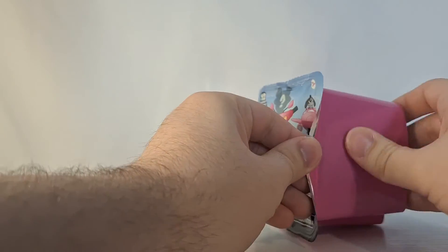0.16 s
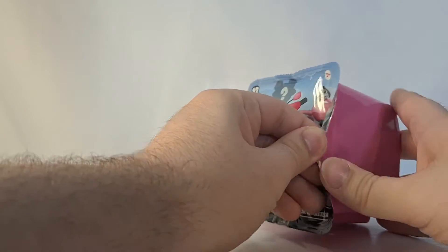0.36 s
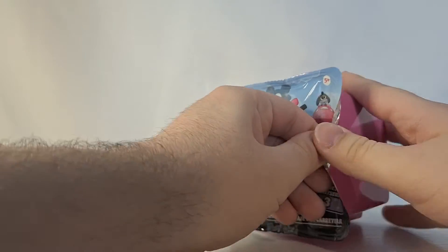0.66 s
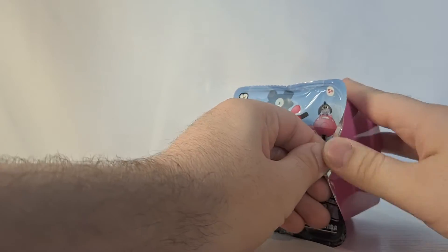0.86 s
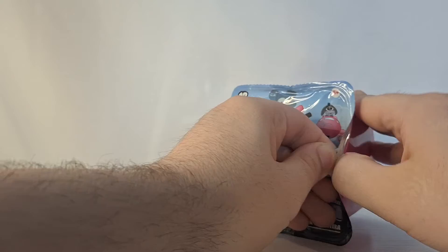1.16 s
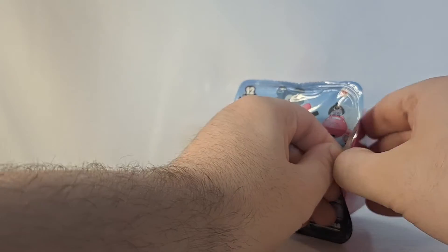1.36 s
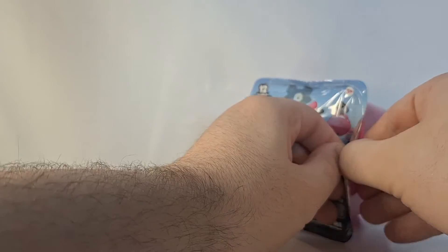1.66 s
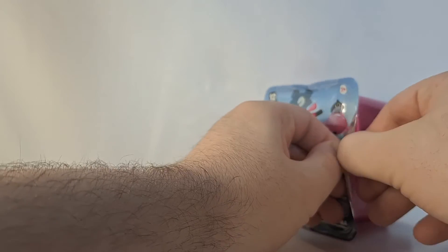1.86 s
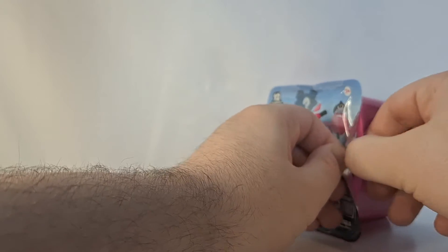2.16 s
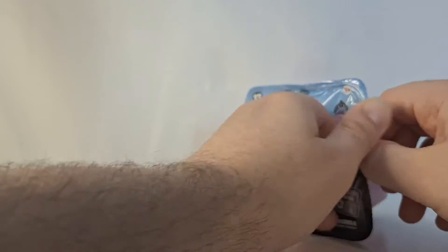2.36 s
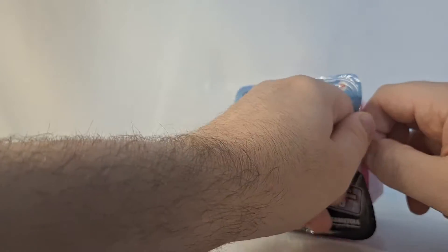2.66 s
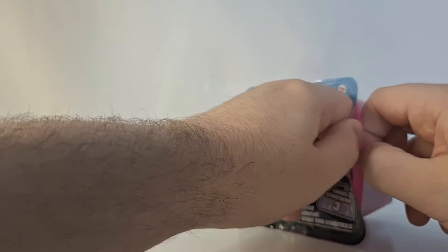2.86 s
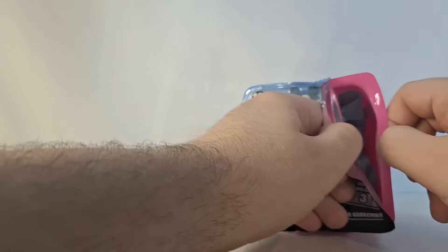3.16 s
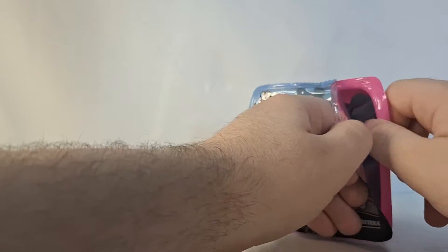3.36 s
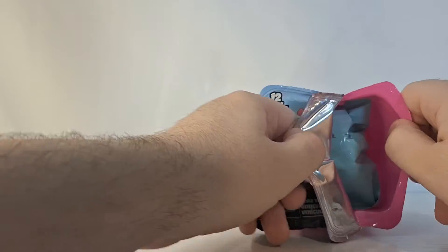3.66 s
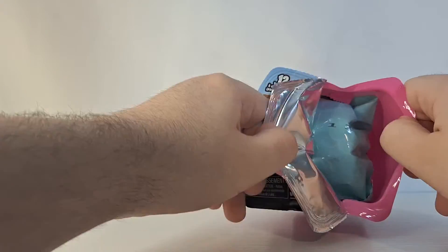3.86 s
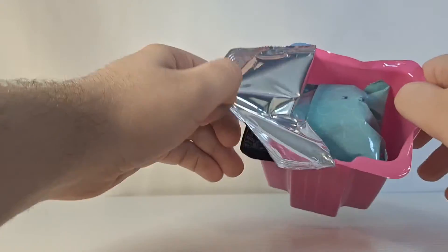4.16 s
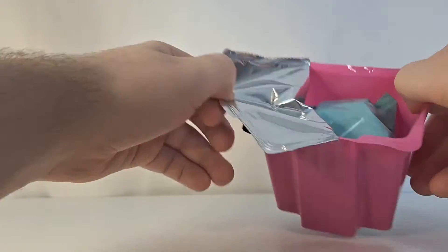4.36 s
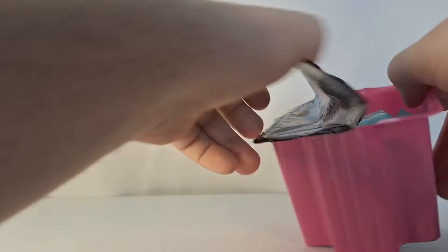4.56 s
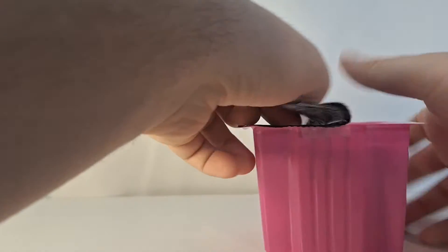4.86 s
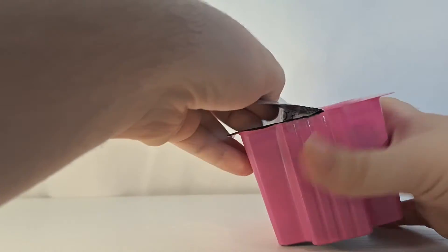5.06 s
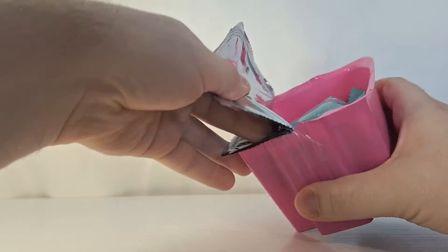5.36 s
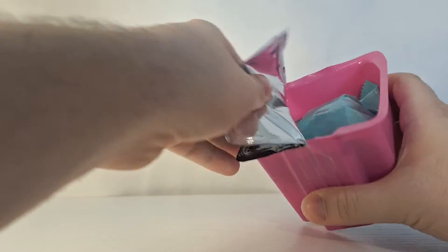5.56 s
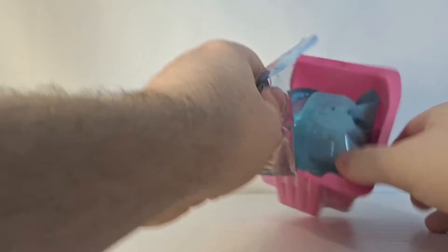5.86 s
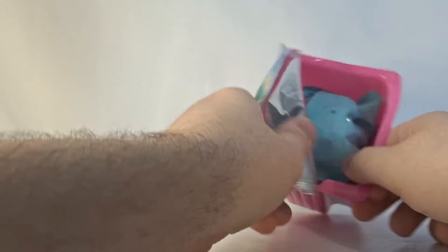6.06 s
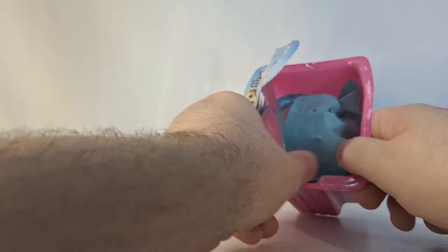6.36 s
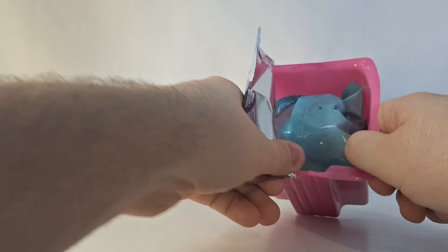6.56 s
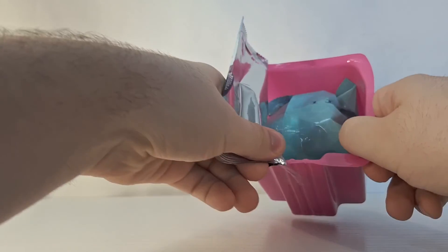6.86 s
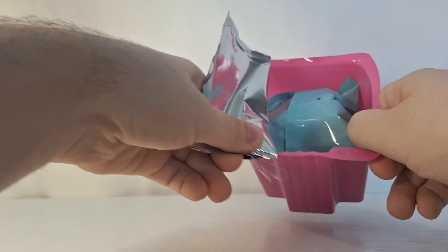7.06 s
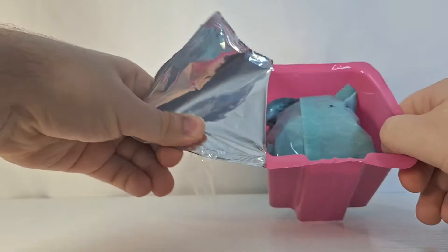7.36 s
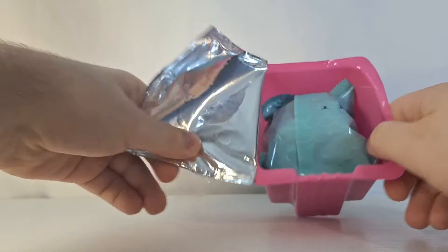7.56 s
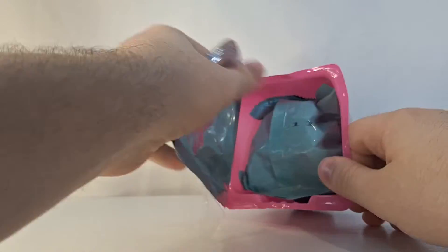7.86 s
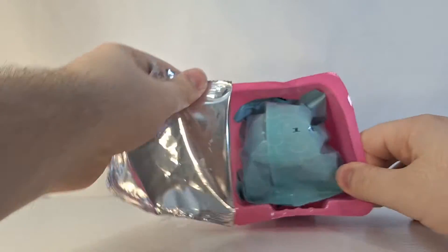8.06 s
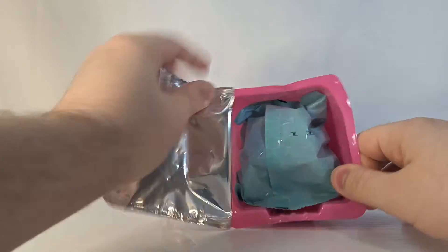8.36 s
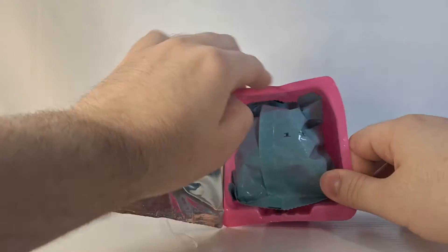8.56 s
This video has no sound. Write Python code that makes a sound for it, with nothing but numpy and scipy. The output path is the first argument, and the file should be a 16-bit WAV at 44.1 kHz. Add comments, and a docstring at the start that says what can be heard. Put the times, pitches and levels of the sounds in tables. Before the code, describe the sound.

Foil seal peeled off a hollow plastic tray: sharp irregular crackles, hollow pops and papery crinkling, with soft handling thumps in a quiet room.

```python
"""Sharp, uneven crackles: fingers peel a foil seal off a hollow plastic tray on a table, in a small quiet room.
Each fold that snaps or glue spot that lets go gives a noisy crack and makes the tray's hollow ring for a few cycles.
Between the loud snaps the sheet crinkles at random, from many tiny rings and bursts of noise,
and fingers and tray rumble on the table: low noise in soft pushes, plus a few knocks.
Flat surfaces and the room answer, over a faint hush; a two-microphone phone close by picks it all up."""
import sys
import numpy as np
from scipy import signal
from scipy.fft import rfft, irfft
from scipy.io import wavfile

SR = 44100
rng = np.random.default_rng(int(sys.argv[2]) if len(sys.argv) > 2 else 0)


def store_pcm(level_fs):
    """Save levels as 16-bit WAV."""
    pcm = np.round(np.clip(level_fs, -1, 1) * 32767).astype(np.int16)
    wavfile.write(sys.argv[1], SR, np.atleast_2d(pcm).T)


N = 383953  # length in samples

# The loud snaps. Each row: start in seconds, ring level in dB, then levels relative to that ring:
# foil facet in dB, crack in dB.
SNAPS = [(0.108, -37.5, -20, -34), (0.127, -33.5, -17.5, -33), (0.184, -41, -8, -16), (0.23, -32, -8, -11),
         (0.272, -31, -11.5, -29), (0.338, -22, -25, -53), (0.554, -33.5, -25, -37), (0.651, -17, -14, -9),
         (0.699, -17, -6, 5), (0.771, -12.5, -3.5, -12), (1.032, -21, -3, -5), (1.109, -27.5, -2, 5.5),
         (1.133, -17, -2, 0), (1.224, -40.5, -8, 9), (1.412, -29, -11, -14), (1.427, -14, -0.5, 0.5),
         (1.46, -20.5, -21, 4.5), (1.485, -16.5, -14, 4.5), (1.509, -12.5, -2, 1), (1.686, -6, -16.5, -9.5),
         (1.762, -24, -11, -26), (1.787, -37.5, -1, 2), (1.891, -28, -10, -10), (1.907, -14.5, -11, -2),
         (1.911, -17.5, -5, -1.5), (1.933, -17, -12, -16), (1.953, -12.5, -11, -5), (1.961, -16, -7.5, -5),
         (2.243, -28, -7.5, -3.5), (2.345, -19.5, -4, -11), (2.365, -23.5, -7, -12),
         (2.375, -24.5, 2.5, 3.5), (2.396, -21.5, -21, -14), (2.405, -21.5, -1.5, -11),
         (2.46, -19, -9, -26), (2.463, -26, 0, -21), (2.527, -13, -11, -13.5), (2.541, -23.5, -18, -28),
         (2.586, -25.5, 2, -15), (2.628, -28.5, 3.5, 7), (2.647, -39, -22, 9), (2.716, -45, 2, 9),
         (2.779, -34, -6, -16), (2.79, -28.5, -17, -14), (2.823, -33.5, -15, 2.5), (2.831, -23, -16, -8),
         (2.854, -18, -28, -20), (2.9, -11, -3.5, -1), (2.943, -30, -24, 3.5), (3.017, -9, -17, -5.5),
         (3.024, -13, -16, -11), (3.037, -6.5, -17, -6.5), (3.051, -11, -20, -18), (3.063, -10, -25, -5.5),
         (3.082, -11, -15, -14), (3.104, -8.5, -17, -15), (3.112, -9, -15, -11), (3.116, -13, -4.5, -7),
         (3.133, -14.5, -11, -3), (3.142, -15.5, -3, -6.5), (3.192, -21.5, -14, -18),
         (3.217, -13, -16, -10.5), (3.234, -20, 2, -8.5), (3.271, -11.5, -30, -4), (3.283, -25, -29, 2),
         (3.461, -23.5, -5, -1), (3.474, -30, -8, 6.5), (3.491, -15.5, -8, -5), (3.511, -14, -13, -7),
         (3.549, -21, -22, -24), (3.566, -18, 2.5, 7.5), (3.578, -22.5, -8, 4), (3.639, -27.5, 4.5, -9),
         (3.697, -29.5, 5, 4), (3.782, -23, 7, 3), (3.842, -19, -1.5, -1.5), (3.954, -31, -10, -40),
         (4.016, -14.5, -2.5, -4), (4.036, -16, -31, -13), (4.062, -12.5, -30, -2.5),
         (4.089, -11.5, -31, -14), (4.098, -16, -22, -0.5), (4.148, -17.5, -18, -8),
         (4.161, -16, -4.5, -3.5), (4.238, -31, -26, -37), (4.329, -15.5, -34, -3.5), (4.392, -26, -6, -5),
         (4.416, -20, -4.5, -19), (4.43, -16, -10, -23), (4.445, -20, -21, -11), (4.477, -25, -18, -18),
         (4.504, -18, -9, -7.5), (4.516, -10, -11.5, -25), (4.59, -34, -10, -6), (4.647, -29, -4, -0.5),
         (4.779, -29.5, -12, -4.5), (4.796, -31, -8, -9), (4.822, -17.5, -6.5, -11),
         (4.859, -22.5, -6, 0.5), (4.932, -26.5, -13, -5), (4.97, -38, 1, -8), (4.999, -19.5, 0, 0),
         (5.037, -19.5, -16, -23), (5.052, -27.5, 9.5, 6), (5.157, -24.5, -22, -17), (5.178, -35.5, 6, -3),
         (5.199, -28.5, 3, 13.5), (5.237, -27, -5.5, -5), (5.293, -25, -12, -3), (5.328, -22.5, -3.5, 4),
         (5.366, -14, -16, -28), (5.413, -27, -6, -4.5), (5.45, -15.5, -8.5, -14.5), (5.478, -25, 0, -10),
         (5.487, -25, -6, -21), (5.529, -19, -6, -11.5), (5.538, -22.5, -8, -6.5), (5.589, -28.5, -17, -10),
         (5.619, -19.5, 0.5, -4.5), (5.655, -18, -2, -8), (5.669, -22, -7, -18), (5.706, -20, -6, -2),
         (5.773, -18, -12, -5.5), (5.825, -25, -12, -17), (5.848, -15.5, -4.5, -13),
         (5.881, -22.5, -2, 3.5), (5.893, -18.5, -2, 0.5), (5.917, -17, -11, -11.5), (5.942, -22, -13, -23),
         (5.969, -24.5, 6, -2.5), (6.063, -28, -4.5, -6.5), (6.101, -46, -1, 4), (6.133, -27, 7, -3),
         (6.4, -36.5, 8.5, 5.5), (6.465, -37, -14, 3.5), (6.517, -16, -5, 1), (6.537, -22, -0.5, -4),
         (6.546, -26.5, -1, 3.5), (6.591, -28.5, 2.5, 0), (6.621, -35, -4, 5), (6.654, -43.5, -10, 8.5),
         (6.674, -23.5, 0.5, -1.5), (6.69, -22.5, -20, -6), (6.798, -47.5, -28, 4), (6.853, -31.5, -13, 0),
         (6.902, -27, -24, 1.5), (6.921, -21, -26, -3), (7.03, -56.5, 12, 16.5), (7.064, -19.5, -1.5, 0.5),
         (7.076, -21, -7, 3.5), (7.124, -16, -15, -4), (7.136, -21, -18, -5), (7.178, -8, -17, -24),
         (7.19, -12.5, -12, -10), (7.197, -8, -18, -16), (7.213, -11.5, -11, -10.5), (7.221, -11, -18, -13),
         (7.263, -16.5, -13, -22), (7.462, -40.5, -24, -29.5), (7.5, -60.5, 9, 0), (7.54, -15.5, -18, -20),
         (7.612, -34, -16, -11), (7.671, -29.5, -23, -10), (7.765, -36, -2.5, 4), (7.812, -33.5, -3, -4),
         (7.877, -42.5, 1, -3.5), (7.923, -24, -15, -16), (7.949, -35, -16, -15), (8.027, -42, -15, 11),
         (8.08, -37, -17, 1.5), (8.097, -37, -24, -12), (8.116, -30.5, -26, 1.5), (8.211, -30, -2, 6),
         (8.3, -48, 3, 3.5), (8.356, -29.5, -8.5, -13), (8.391, -27.5, -12, -14), (8.409, -21.5, 4.5, -0.5),
         (8.467, -34.5, 5, -12), (8.515, -30, -4.5, -17), (8.575, -17, -2, -8), (8.632, -24, -4, -5),
         (8.675, -22.5, 1, 2.5)]
# Slow drift of two layers. Each row: time in seconds, change of the rumble in dB,
# change of the snaps' sizzle in dB.
DRIFT = [(0, 2.5, -4), (.3, 6, -2), (.8, -5, -5.5), (1.3, -7.5, -10), (1.8, -5.5, -4.5), (2.2, -10, -0.5),
         (2.7, 4.5, 4.5), (3.2, -3.5, 1.5), (3.8, 5, -2), (4.4, 0, 9), (5, 4, 1), (5.6, -1.5, -2.5),
         (6.2, 0, -8), (6.7, -5, 8.5), (7.2, 4.5, 0.5), (7.5, 0.5, -4), (7.9, 3, -1.5), (8.3, -1, 5.5),
         (8.7, 0, 0)]


def undb(db):
    """Turn decibels into a plain gain factor."""
    return 10 ** (np.asarray(db) / 20)


def colour(x, points):
    """Filter by a curve of (Hz, dB) points; the folded cepstrum makes it act without any pre-echo."""
    hz, db = np.transpose(points)
    grid_hz = np.linspace(1, SR / 2, 2049)
    gain = undb(np.interp(np.log(grid_hz), np.log(hz), db))
    cepstrum = irfft(np.log(gain))
    # fold the backward half onto the forward half
    cepstrum[1:2048] *= 2
    cepstrum[2049:] = 0
    response = irfft(np.exp(rfft(cepstrum)))
    return signal.oaconvolve(x, response)[:N]


def band(x, lo_hz, hi_hz):
    """Keep mainly the pitches between two edges."""
    edges = [lo_hz, min(hi_hz, .45 * SR)]
    return signal.sosfilt(signal.butter(2, edges, "band", fs=SR, output="sos"), x)


def lay(s, grains):
    """Add up short sounds, one per row, each starting at its time in seconds."""
    start = np.clip((s * SR).astype(int), 0, N)
    at = start[:, None] + np.arange(grains.shape[1])
    return np.bincount(at.ravel(), grains.ravel(), N + grains.shape[1] + 1)[:N]


def rings(s, db, hz, cycles, size):
    """A push that swells for the given cycles of its pitch and dies soon after; size is in samples."""
    turns = np.arange(size) / SR * hz[:, None]
    swell = (turns / cycles * np.exp(1 - turns / cycles)) ** 1.43
    return lay(s, undb(db)[:, None] * swell * np.sin(2 * np.pi * turns))


def scatter(per_s, spread_db):
    """Random moments, sizes in dB of which a few lie far from the rest, and four more draws for each."""
    chance = rng.random((int(per_s * N / SR), 6)).T
    s = chance[0] * N / SR
    size_db = -spread_db * np.log(np.maximum(chance[1], .025))
    return s, size_db, chance[2:]


def hush():
    """Faint room tone: steady coloured noise, partly different at the two microphones."""
    # Each row: frequency in Hz, relative level in dB.
    tone = [(18, -24), (30, 15), (437, -15), (554, 5.5), (632, 0.5), (988, -4.5), (1390, -50.5),
            (6900, -21.5), (16000, -36)]
    level_db = -66  # of the part common to both microphones
    mid, side = (colour(rng.standard_normal(N), tone) for _ in range(2))
    return undb(level_db) / mid.std() * (mid + 0.54 * side * np.array([[1], [-1]]))


def room(x):
    """Table and walls answer with a dense tail of noise that dies soonest in the bass, last in the middle."""
    # Bands of the tail. Each row: low edge in Hz, high edge in Hz, seconds to fade by 60 dB, level in dB.
    tail_bands = [(42.1, 170, 0.089, -3), (583, 1550, 0.15, -5), (1380, 5870, 0.14, -2.5),
                  (6270, 15000, 0.14, -1)]
    t = np.arange(int(.4 * SR)) / SR
    near, apart = rng.standard_normal(len(t)), rng.standard_normal((2, len(t)))
    tail = 0
    for lo_hz, hi_hz, t60, db in tail_bands:
        share = min(lo_hz / 1600 + 0.45, 1)  # long waves reach both microphones more alike
        noise = band(np.sqrt(1 - share ** 2) * near + share * apart, lo_hz, hi_hz)
        fading = undb(db - 60 * t / t60)
        tail = tail + noise * fading / np.sqrt(t60 * SR / np.log(1e6))
    onset = np.minimum(t / 0.0038, 1)
    return signal.oaconvolve(x[None], tail * onset, axes=1)[:, :N]


def echoes(x):
    """Nearby flat surfaces throw each ring back a few milliseconds later."""
    # Backdrop and table edge close by. Each row: delay in seconds, level in dB.
    surfaces = [(.0053, -19.5), (.0098, -28.5), (.0145, -29)]
    return x + sum(undb(db) * np.pad(x, (int(late * SR), 0))[:N] for late, db in surfaces)


def handling(s):
    """Levels of small rings and rustle: they swell, drop, settle; each snap sets off more small folds."""
    # Swells of small rings and rustle. Each row: strongest moment in seconds, swell in seconds,
    # small rings in dB, rustle relative to those rings in dB.
    swells = [(0.0, .03, -33, -12.5), (.17, 0.16, -57, -13.5), (.23, 0.056, -52, -5),
              (0.284, 0.072, -45, -4), (0.422, 0.18, -49.5, -5), (.54, 0.27, -58.5, -12),
              (0.669, 0.09, -43.5, -18), (.773, 0.13, -40.5, 3), (.865, 0.22, -41.5, -2.5),
              (.94, 0.29, -43.5, -4), (1.028, 0.084, -36, -5), (1.136, 0.04, -34, 0.5),
              (1.238, 0.088, -42.5, 1.5), (1.44, 0.25, -52.5, 2), (1.508, 0.041, -40, 7),
              (1.701, .04, -38.5, 0), (1.78, .1, -52, -8), (1.919, 0.024, -27, 4.5),
              (1.948, 0.061, -32, 5.5), (2.25, 0.15, -68.5, 13), (2.406, 0.19, -33, -4),
              (2.5, 0.55, -44.5, -3), (2.584, 0.25, -40, -9), (2.65, 0.025, -47.5, 7.5),
              (2.79, 0.055, -55.5, 0), (2.848, 0.034, -28, -8.5), (3.054, 0.043, -18, -3.5),
              (3.121, 0.13, -23.5, -4), (3.233, 0.078, -36.5, -2.5), (3.281, .05, -33.5, -0.5),
              (3.432, .05, -43, -2), (3.466, .12, -38.5, -4), (3.572, 0.11, -27.5, -9),
              (3.68, 0.24, -51.5, -3), (3.85, 0.14, -33.5, 2.5), (3.874, 0.062, -45, -14),
              (4.018, .04, -29, -3), (4.108, 0.11, -27, 2.5), (4.332, 0.015, -28, -8.5),
              (4.43, 0.063, -28, -11.5), (4.514, 0.03, -24.5, -20), (4.59, 0.092, -41, -4.5),
              (4.65, 0.11, -42, -1.5), (4.684, 0.12, -49.5, 0), (4.78, 0.19, -57, 4.5),
              (4.859, 0.17, -49, -5), (4.96, 0.23, -58, 13), (5.055, 0.56, -42.5, -17),
              (5.209, 0.089, -34, -4), (5.333, 0.18, -59, 13), (5.43, .1, -60, 4), (5.529, 0.096, -36, -3),
              (5.631, 0.024, -32.5, -30), (5.767, 0.067, -34, -2), (5.857, 0.064, -25.5, -14),
              (5.972, 0.18, -30, -10.5), (6.146, 0.075, -33, -4), (6.165, 0.055, -47, -5),
              (6.397, 0.15, -49.5, -5), (6.538, 0.085, -34, -16), (6.625, 0.11, -53, 7),
              (6.46, 0.11, -50, -3), (6.691, 0.021, -42, 8), (6.922, 0.097, -37, 4.5),
              (6.975, 0.12, -45, 5), (7.079, 0.13, -50, 0), (7.138, 0.054, -26.5, 2),
              (7.195, 0.12, -31.5, 3), (7.56, 0.023, -45, -6), (7.235, .06, -35.5, -14),
              (7.63, 0.13, -39.5, -6.5), (7.698, 0.36, -48.5, -3.5), (7.772, 0.045, -42.5, 0),
              (7.936, 0.078, -46.5, -0.5), (8.01, 0.3, -47.5, -4), (8.121, 0.24, -46.5, 1),
              (8.221, 0.085, -56, -5), (8.31, 0.16, -59, -6), (8.406, 0.16, -42.5, -1),
              (8.49, 0.11, -51, 7), (8.575, 0.21, -37, -6), (8.664, 0.079, -27, -2)]
    swell_db = 30.5  # rise over the swell
    release_db_per_s = 594.5  # quick let-go
    settle_db, settle_db_per_s = -11.5, 200  # slower settling of the sheet
    after_db, after_db_per_s = -25.5, 500  # small folds under the ring and crack of each snap

    peak, swell_s, small_db, rustle_db = np.transpose(swells)
    snap, snap_db, _, crack_db = np.transpose(SNAPS)
    t = np.arange(0, N / SR + .01, .002)
    late, since = t[:, None] - peak, t[:, None] - snap
    rise = swell_db * late / np.maximum(swell_s, .005)
    fall = np.maximum(-release_db_per_s * late, settle_db - settle_db_per_s * late)
    shape_db = np.where(late < 0, rise, np.minimum(fall, 0))
    after = (since > 0) * undb(after_db - after_db_per_s * np.abs(since))

    def level(peak_db, top_db):
        from_swells = (undb(peak_db + shape_db) ** 2).sum(axis=1)
        from_snaps = ((undb(top_db) * after) ** 2).sum(axis=1)
        return np.interp(s, t, 10 * np.log10(from_swells + from_snaps + 1e-12))

    return level(small_db, snap_db), level(small_db + rustle_db, snap_db + crack_db)


def rumble():
    """Fingers and tray shift on the table in soft rough pushes, with a few clear knocks."""
    # The tray knocking the table top. Each row: start in seconds, relative level in dB, pitch in Hz.
    bumps = [(0.643, -45, 121), (1.894, -47, 110), (3.043, -22, 148), (3.205, -33.5, 137), (3.53, -32, 133),
             (4.323, -54, 124), (4.418, -34, 159), (5.154, -43, 70.0), (5.688, -30, 98),
             (5.848, -23.5, 139), (6.126, -41.5, 54.5), (6.917, -34.5, 67.3), (7.119, -57, 45.8),
             (7.121, -32.5, 108), (7.183, -30.5, 104.2), (7.602, -38.5, 159), (7.605, -32.5, 127),
             (7.911, -37, 90)]
    # Colour of the pushes. Each row: frequency in Hz, relative level in dB.
    push_colour = [(25, -22.5), (60, -2), (107, -1.5), (165, -4), (260, 0.5), (330, 3.5), (450, 3),
                   (700, -37)]
    s, size_db, _ = scatter(per_s=180, spread_db=-0.17)
    ring_db, _ = handling(s)
    when, low_db, _ = np.transpose(DRIFT)
    # the rumble follows the handling, less steeply
    push_db = -9 + 0.75 * ring_db + np.interp(s, when, low_db) + size_db
    pushes = lay(s, undb(push_db)[:, None] * np.hanning(400))
    mid, side = (colour(rng.standard_normal(N) * pushes, push_colour) for _ in range(2))
    s, db, hz = np.transpose(bumps)
    knocks = rings(s, db - 0.5, hz, cycles=0.44, size=4000)
    shifting = undb(10) * (mid + 0.21 * side * np.array([[1], [-1]]))
    return shifting + knocks * undb([[.6], [-.6]])


def cracks(s, band_db, pan_db, fall_s, alike):
    """Millisecond bursts of noise; the two microphones see the crumpled sheet from different sides."""
    # Colour of a crack at each microphone. Each row: frequency in Hz, level in dB.
    left, right = [(600, -15), (1300, -5.5), (2100, 0), (3000, -5.5), (5000, -2.5), (7300, -5), (9000, -20),
                   (12000, -19), (15500, -13.5)], [(600, -6), (1300, -5.5), (2100, 1), (3000, -4), (5000, -5), (7300, -8),
                                 (9000, -17), (12000, -7), (15500, -10)]
    # Facet, crack and sizzle. Each row: low edge in Hz, high edge in Hz.
    crack_bands = [(1200, 2800), (2800, 8500), (8500, 18000)]
    fall = np.exp(-np.arange(200)[None] / SR / fall_s[:, None])
    shared, out = rng.standard_normal(N), []
    for side, points in ((1.08, left), (-4.0, right)):
        noise = alike * shared + np.sqrt(1 - alike ** 2) * rng.standard_normal(N)
        total = 0
        for k, (db, edges) in enumerate(zip(band_db, crack_bands)):
            bursts = noise * lay(s, fall * undb(db + side * pan_db / 2)[:, None])
            # turned signs join the bands without a notch
            total = total + band((-1) ** k * bursts, *edges)
        out.append(colour(total, points))
    return np.array(out)


def crinkles():
    """Many small folds at random moments, dull or bright; a gentle touch blurs them into a smooth rub."""
    s, size_db, chance = scatter(per_s=700, spread_db=3.5)
    ring_db, rustle_db = handling(s)
    hollow_db = ring_db + 1.336 * size_db - 2.5
    hollow = rings(s, hollow_db, 600 + 600 * chance[0], cycles=0.81, size=200)
    # a stronger touch spreads the sizes and brightness more and shortens the bursts
    force = np.clip((rustle_db + 52.5) / 30, .15, 1)
    db = rustle_db + force * size_db
    facet_hz = 1250 * 4.5 ** chance[3] ** 1.503
    facet = rings(s, db - 16, facet_hz, cycles=4.7, size=200)
    bright_db = 12 * force * (chance[0] - .5)
    band_db = db + 3.5 - bright_db, db - 0.5, db + 3.0 + bright_db + 6 * force
    fall_s = (0.00012 + 0.0018 * chance[2]) * (2.5 - 1.66 * force)
    return hollow + facet, cracks(s, band_db, 8 * (chance[1] - .5), fall_s, alike=0.28)


def snaps():
    """Each snap rings the hollow and a facet of the sheet, at scattered pitches, and flexes the tray's floor."""
    s, db, facet_db, crack_db = np.transpose(SNAPS)
    chance = rng.standard_normal((len(s), 6)).T
    # pitches in Hz, each scattered at random from snap to snap
    hollow = rings(s, db, 930 * undb(0.88 * chance[4]), cycles=1.29, size=500)
    facet = rings(s, db + facet_db + 0.5, 1900 * undb(1.52 * chance[2]), cycles=2.05, size=300)
    floor = rings(s, db - 18, 330 * undb(1.82 * chance[3]), cycles=1.0, size=900)
    when, _, top_db = np.transpose(DRIFT)
    # the top octave follows the crack, steeper than it
    sizzle_db = 11.5 + np.interp(s, when, top_db) + 1.65 * crack_db + 1.5 * chance[5]
    band_db = db + facet_db + 8.5, db + crack_db + 8.5, db + sizzle_db
    fall_s = 0.0018 * undb(1.2 * chance[0])
    return hollow + facet + floor, cracks(s, band_db, 3.51 * chance[1], fall_s, alike=0.3)


def scene():
    """Add all layers; two room tails trade places steadily, so the reverberation is not always the same."""
    ring, crack = snaps()
    small_ring, small_crack = crinkles()
    near = echoes(ring + small_ring) + rumble() + crack + small_crack
    swap_hz = 1.3
    turn = 2 * np.pi * swap_hz * np.arange(N) / SR
    answer = room(near[0] * np.cos(turn)) + room(near[0] * np.sin(turn))
    return near + answer + hush()


def record(dry):
    """The loudest peaks are rounded off softly, and the phone cuts the top."""
    ceiling, top_hz = .82, 16150
    rounded = ceiling * np.tanh(dry / ceiling)
    return signal.sosfilt(signal.ellip(10, .2, 80, top_hz, fs=SR, output="sos"), rounded)


dry = scene()
out = record(dry)
store_pcm(out)
```